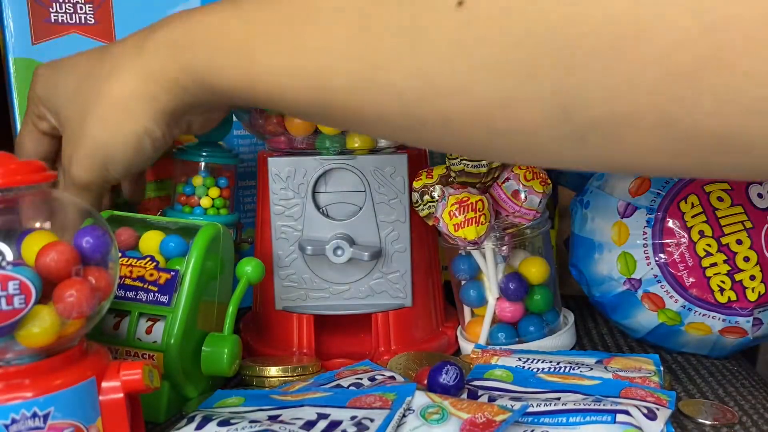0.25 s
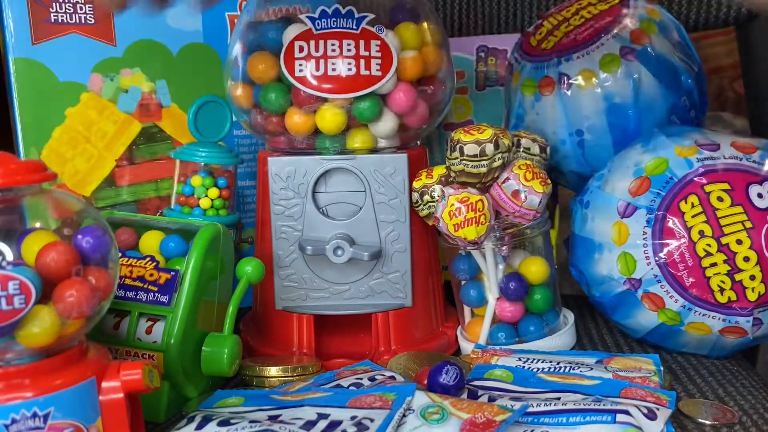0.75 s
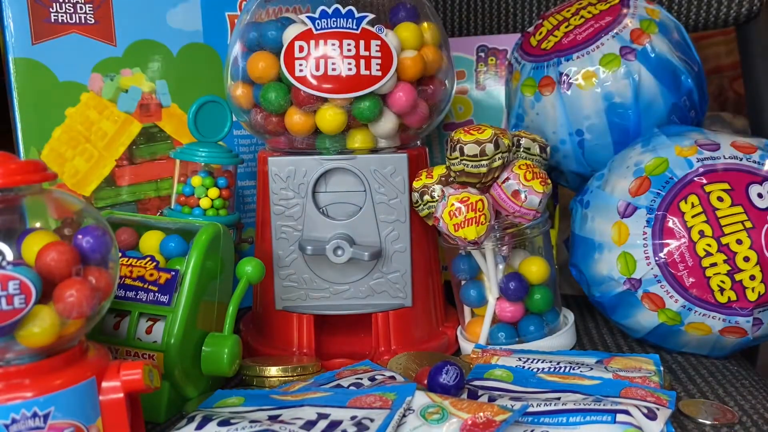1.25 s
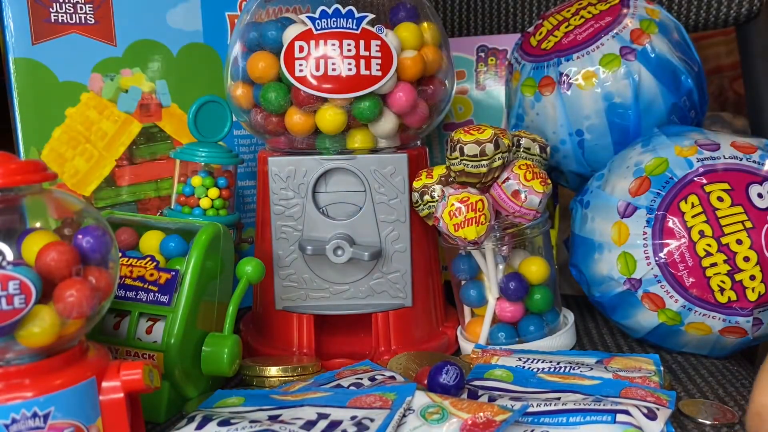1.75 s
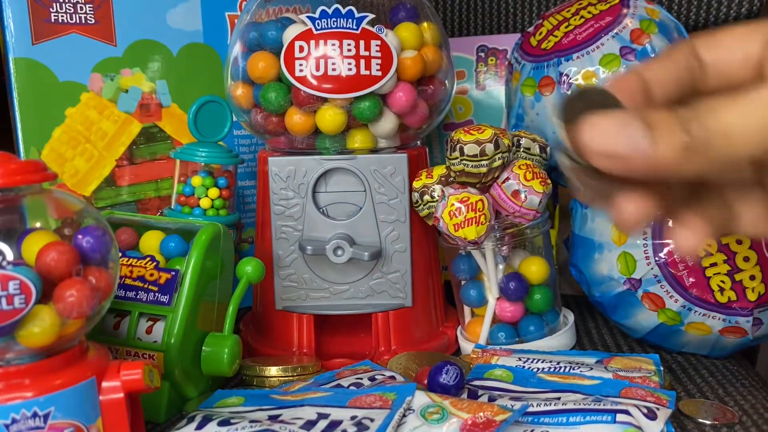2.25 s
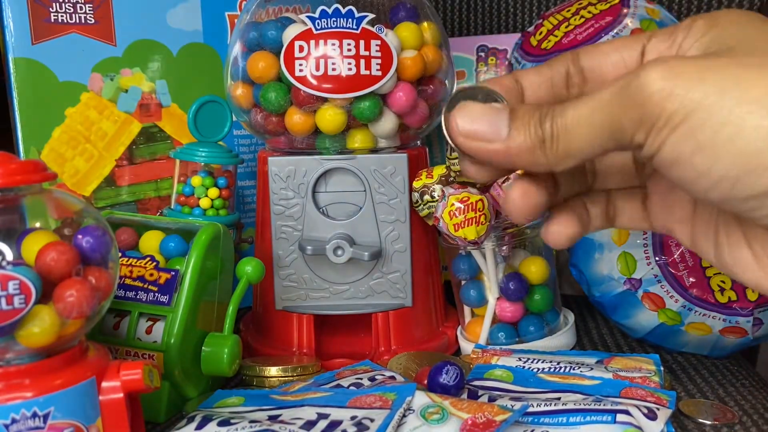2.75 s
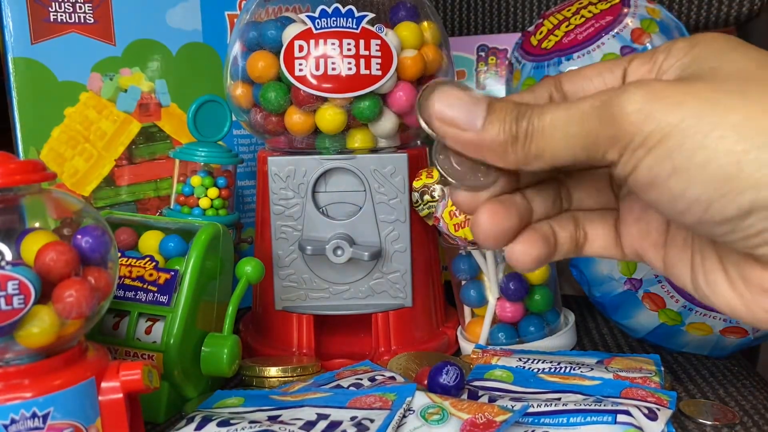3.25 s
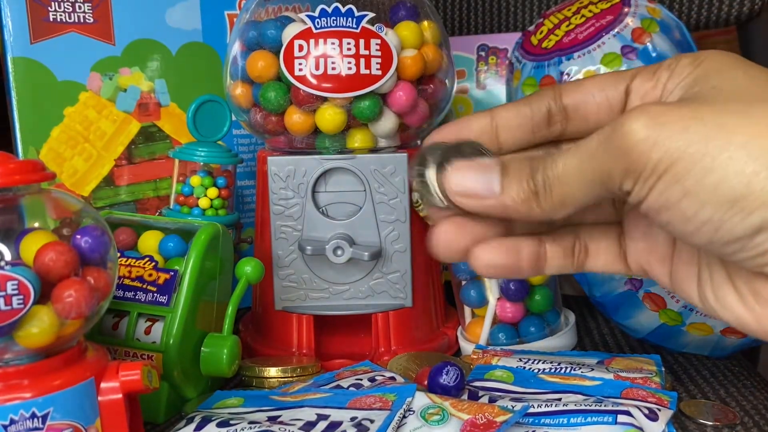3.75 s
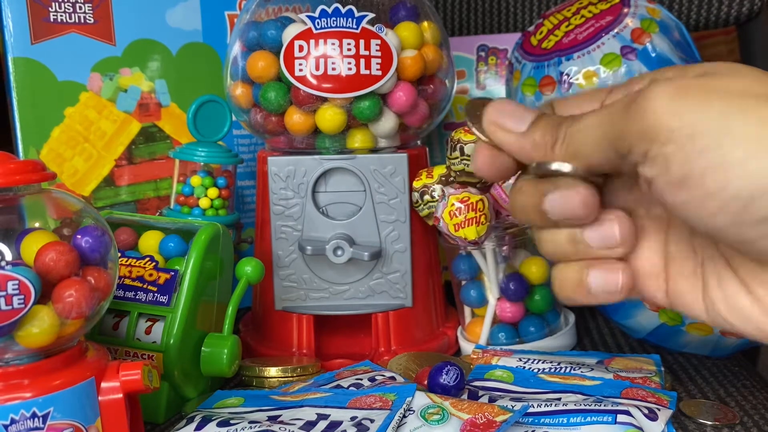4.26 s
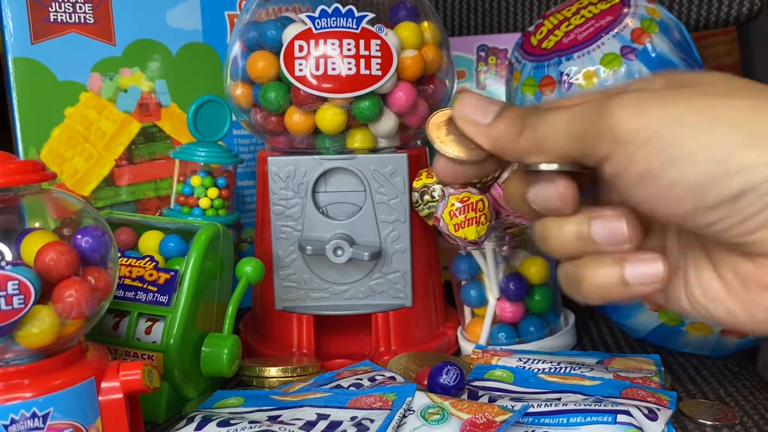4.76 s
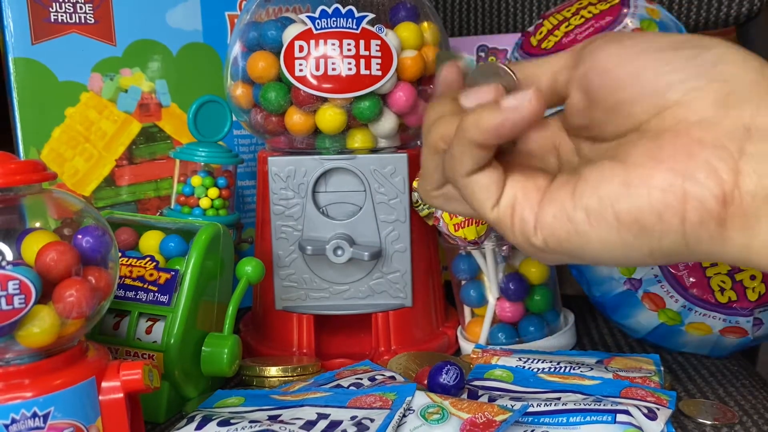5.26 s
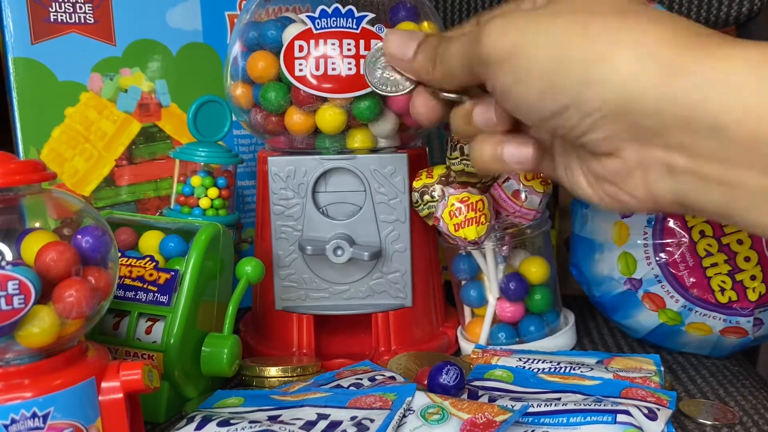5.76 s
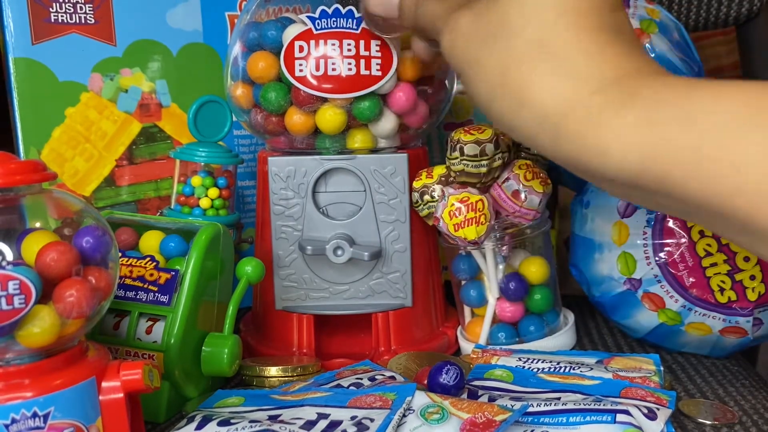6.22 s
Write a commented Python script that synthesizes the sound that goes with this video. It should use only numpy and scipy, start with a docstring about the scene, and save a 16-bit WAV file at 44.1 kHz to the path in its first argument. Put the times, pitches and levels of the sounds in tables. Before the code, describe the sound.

A small quiet room with a low hum. Fingers knock dully on hollow plastic toys slightly to the left while the table rumbles softly. After a pause, a few coins are fingered close to the stereo microphone: faint clinks at first, then bright, choked clinks and short metallic scrapes. A long near-silence follows, with a faint clink, and finally a coin taps a thin plastic lid on the right and bounces once.

```python
"""Over the low hum of a small, quiet room, a hand knocks on hollow plastic toys and the table rumbles.
Then a few coins are fingered close to the microphone: damped modes clink, dense runs of tiny blows slide.
Two coin grazes brush the lid of a toy gumball machine on the way; at last a full tap and its bounce ring it.
Knocks, coins and lid are banks of decaying modes with a noisy crack, sent to a short echo; the room is
filtered noise."""
import sys
import numpy as np
from scipy import signal
from scipy.fft import rfft, irfft, next_fast_len
from scipy.io import wavfile
from scipy.ndimage import uniform_filter1d

SR = 44100
rng = np.random.default_rng(int(sys.argv[2]) if len(sys.argv) > 2 else 0)


def log_audio(samples):
    """Write samples as a 16-bit WAV file to the path given in sys.argv[1]."""
    # one column per channel
    frames = np.atleast_2d(samples).T
    # limit to full scale, then quantise
    limited = np.clip(frames, -1, 1)
    pcm = np.round(limited * 32767).astype(np.int16)
    wavfile.write(sys.argv[1], SR, pcm)


N = 286209  # length of the scene [samples]
LEFT_RIGHT = np.array([[1], [-1]])  # opposite signs for the left and right channel


def undb(db):
    """Turn decibels into gain."""
    return 10 ** (np.asarray(db) / 20)


def unit(x):
    """Scale to an rms of one."""
    return x / np.sqrt(np.mean(x ** 2))


def contour(hz, points, column=1):
    """Read a table against frequency on a log axis."""
    rows = np.array(points)
    return np.interp(np.log(hz + 1), np.log(rows[:, 0]), rows[:, column])


def band(x, lo, hi, order=3):
    """Causal band-pass."""
    sos = signal.butter(order, [lo, min(hi, SR / 2 - 100)], "band", fs=SR, output="sos")
    return signal.sosfilt(sos, x)


def add(out, s, sound, pan_db):
    """Mix a sound in at time s; pan_db is left minus right."""
    i = int(s * SR)
    part = sound[:, :N - i]
    out[:, i:i + part.shape[1]] += part * undb(LEFT_RIGHT * pan_db / 2)


def ring(modes, damping, crack_db, crack_s, detune, vary_db, size, rise_s=.0003,
         port_phase=0.13, port_blur=0.27, chatter_db=5):
    """One blow: a chattering crack of contact over decaying modes, their pitch and weight varied per blow."""
    t = np.arange(size) / SR
    hz, db, t60 = np.array(modes).T[:, :, None]
    hz = hz * (1 + detune * rng.standard_normal(hz.shape))
    db = db + vary_db * rng.standard_normal(hz.shape)
    # each mode starts at a random phase, and the two ports part more at high pitch
    start_phase = 2 * np.pi * rng.random(len(modes))
    port_offset = port_phase * hz.T / 7000 * rng.standard_normal((2, len(modes)))
    phase = np.exp(1j * (start_phase + port_offset))
    decay = undb(db - 60 * damping * t / t60)
    tones = np.imag(phase @ (decay * np.exp(2j * np.pi * hz * t)))

    shared, apart, grain = rng.standard_normal((3, size))
    chatter = undb(chatter_db * unit(uniform_filter1d(grain, size=24)))
    # long waves reach both ports alike, short ones differ
    noise = shared + port_blur * LEFT_RIGHT * np.diff(apart, prepend=0)
    crack = noise * chatter * np.exp(-t / crack_s)
    return (unit(tones) + undb(crack_db) * unit(crack)) * (1 - np.exp(-t / rise_s))


def strike(events, blows, bands, pan_db, size):
    """Play a table of blows; brightness and weight shift the level of each register of the object."""
    rows, sounds, out = np.array(events), 0, np.zeros((2, N))
    for lo, hi, trim_db, *response in bands:
        db = rows[:, 1] + trim_db + rows[:, 2:] @ np.array(response)
        part = band(np.array(blows), lo, hi, order=4)
        # level each register by its loudest short-time rms
        peak = np.sqrt(uniform_filter1d(part ** 2, size, axis=2).max(axis=2, keepdims=True))
        sounds = sounds + undb(db)[:, None, None] * part / peak
    for s, sound in zip(rows[:, 0], sounds):
        add(out, s, sound, pan_db)
    return out


# tone of the still room: (frequency [Hz], relative density [dB per Hz])
ROOM_TONE = [(15, -38), (25, -26), (40, -11.5), (80, 1), (120, -6), (200, -13.5), (350, -16), (600, -22),
             (1000, -27), (2000, -33), (4000, -36.5), (7000, -38.5), (12500, -45), (15000, -48.5)]
# likeness of the room noise at the two ports: (frequency [Hz], correlation [-1 to 1])
PORT_LIKENESS = [(60, .7), (130, 0.54), (290, .46), (700, -0.46), (3000, 0.24), (6500, 0.025), (9000, 1),
                 (15000, .6)]


def air(noise_db=-70, hum_hz=58, hum_width_hz=5, hum_db=-69.0, whine_hz=1180, whine_db=-103, left_db=3.5):
    """Room rumble and faint hiss, with the wavering hum and thin whine of a distant appliance."""
    n = next_fast_len(N, True)
    hz = np.fft.rfftfreq(n, 1 / SR)
    mid, side, hum, whine = rfft(rng.standard_normal((4, n)))
    alike = np.clip(contour(hz, PORT_LIKENESS), -1, 1)
    ports = mid * np.sqrt(1 + alike) + LEFT_RIGHT * side * np.sqrt(1 - alike)
    lean = undb(LEFT_RIGHT * left_db / 2 / (1 + (hz / 130) ** 4))  # the bass is stronger on the left
    noise = unit(irfft(ports * lean * undb(contour(hz, ROOM_TONE))))
    # narrow bands of noise waver like unsteady tones
    hum = unit(irfft(hum * lean / (1 + ((hz - hum_hz) / hum_width_hz) ** 2)))
    whine = unit(irfft(whine / (1 + ((hz - whine_hz) / 10) ** 2)))
    return (undb(noise_db) * noise + undb(hum_db) * hum + undb(whine_db) * whine)[:, :N]


# rumble of the arm shifting on the table, before panning: (time [s], level [dB])
ARM_RUMBLE = [(0, -71), (.32, -62.5), (.55, -71.5), (1.3, -77.5), (2.1, -71), (2.5, -76), (3.2, -78.5),
              (4.3, -97.5)]


def table(start_s=0.097, hz=52, swell_s=0.032, db=-50, lo_hz=65, hi_hz=200):
    """The leaning hand sets the table rocking for a moment, and the moving arm rumbles on it."""
    clock = np.arange(N) / SR
    t = np.maximum(clock - start_s, 0)
    swell = t / swell_s * np.exp(1 - t / swell_s)
    sway = undb(db) * swell * np.sin(2 * np.pi * hz * t)
    rumble = unit(band(rng.standard_normal(N), lo_hz, hi_hz, order=2))
    rumble = rumble * undb(np.interp(clock, *np.transpose(ARM_RUMBLE)))
    return (sway + rumble) * undb(1.7 * LEFT_RIGHT)  # a little to the left


# fingers on the plastic toys; a nail is bright, a fingertip has weight:
# (time [s], strength [dB], brightness [dB], weight [dB])
TOY_KNOCKS = [(0.0956, -65.5, -40, 4), (0.2072, -49, -3, -18.5), (0.216, -66, 1.5, 1.5),
              (0.273, -61.5, -23, -12), (0.3024, -46.5, -11, -16), (0.3174, -54, -6.5, 4.5),
              (0.41, -60.5, -8, 0), (0.428, -73.5, -1, 13.5), (0.7039, -83.5, 21.5, -6)]
# modes of a hollow plastic toy: (frequency [Hz], level [dB], t60 before damping [s])
TOY_MODES = [(320, -14, 0.057), (601, -7, 0.05), (810, 0, 0.04), (897, 12, 0.029), (1135, 1, 0.079),
             (1210, -2.5, 0.064), (1470, -9, 0.024), (2030, 1, 0.031), (2740, -2, 0.027), (3510, 3, 0.016),
             (4730, -20, 0.026)]
# registers of the toy:
# (from [Hz], to [Hz], trim [dB], response to brightness [dB per dB], response to weight [dB per dB])
TOY_REGISTERS = [(690, 1480, 0, 0.07, 0.039), (4200, 15000, -1, 0.68, 0.11), (1450, 3990, 1.5, 1, 0.11),
                 (142, 640, 1.2, 0.083, 0.73)]


def toys():
    """Fingers excite the short, low modes of hollow plastic: dull knocks on the left."""
    blows = [ring(TOY_MODES, damping=1.7, crack_db=5.4, crack_s=0.011, detune=0.041, vary_db=1.5, size=2600)
             for _ in TOY_KNOCKS]
    return strike(TOY_KNOCKS, blows, TOY_REGISTERS, pan_db=3.5, size=176)


# echo of the room: (frequency [Hz], t60 [s], level [dB])
ROOM_ECHO = [(302, 0.13, -7.5), (987, 0.14, -6.5), (3060, 0.17, -8), (5112, 0.17, -9.5),
             (8300, 0.052, -10.5), (13700, 0.15, -16.5)]


def room(sent, build_s=0.0015, apart_hz=1200, treble_hz=6000, size=15000):
    """Boxes and walls close by scatter a short echo, each band of noise fading at its own pace."""
    t = np.arange(size) / SR
    edges = np.geomspace(150, 17000, 11)
    echo = 0
    for lo, hi in zip(edges, edges[1:]):
        centre = np.sqrt(lo * hi)
        fade = undb(-60 * t / contour(centre, ROOM_ECHO)) * (1 - np.exp(-t / build_s))
        fade *= undb(contour(centre, ROOM_ECHO, column=2)) / np.sqrt(np.sum(fade ** 2))
        mid, side = band(rng.standard_normal((2, size)), lo, hi)
        # the echo is widest in the middle register
        width = min(centre / apart_hz, 1) / (1 + (centre / treble_hz) ** 2)
        echo = echo + fade * (mid + width * side * LEFT_RIGHT) / np.sqrt(1 + width ** 2)
    return signal.oaconvolve(sent, echo, axes=1)[:, :N]


COIN_PAN_DB = 0.2  # left minus right
# coin against coin; a rim-on hit is bright, a coin pressed against something solid has weight:
# (time [s], strength [dB], brightness [dB], weight [dB])
COIN_CLINKS = [(1.4081, -68.5, 5, 16), (1.449, -62.5, 7.5, 18.5), (1.4963, -46, -1.5, 4.5),
               (1.7551, -48, 2, 13.5), (1.794, -56, 9, 16), (1.7979, -40.5, 9, 16), (1.8688, -55.5, 9, -7),
               (1.877, -51.5, 9, 8), (1.891, -59.5, 0, 21), (1.9044, -55, -10, 22), (1.9244, -50, 13.5, 14),
               (1.9592, -52.5, 7.5, 10.5), (2.1639, -62.5, 8, 8), (2.2422, -49, 3, 6),
               (2.2626, -39.5, -16, 4.5), (2.2877, -35, 10.5, 17), (2.3433, -44.5, 2, 2),
               (2.6388, -32.5, 4.5, 14), (2.893, -59.5, 6, 10), (2.9195, -25, 2, -5.5),
               (2.921, -22.5, 0.5, -8), (2.962, -37.5, 0.5, -5), (2.994, -44.5, 0, -6),
               (3.1189, -32.5, -6, -19), (3.1283, -32.5, 2.5, -33), (3.1543, -30.5, 4, 0.5),
               (3.2358, -41.5, 1.5, -13), (3.3313, -50.5, -7, 18), (3.3521, -30.5, 2.5, 1.5),
               (3.403, -34.5, -5, -5), (3.4768, -42.5, 3, -13), (3.4882, -35.5, -1.5, -7),
               (3.5941, -55, 1.5, -12.5), (3.782, -36, -3, 3), (3.833, -31, -12, -14),
               (4.0995, -43.5, -5, 12.5), (5.5089, -43, 13.5, 7)]
# modes of a few coins pinched between fingers, lying close together:
# (frequency [Hz], level [dB], t60 before damping [s])
COIN_MODES = [(2500, -11, 0.012), (3200, -10.5, 0.008), (4550, -8, 0.015), (4770, -11, 0.02),
              (5372, -9, 0.016), (5940, -14.5, .02), (6550, -5.5, 0.027), (6627, -8, .03),
              (6950, -5, 0.043), (7320, 0, .03), (7550, -2, .03), (7000, 1.5, 0.014), (7770, -2.5, 0.033),
              (7440, -2.5, 0.013), (7915, 1.5, 0.02), (8150, 1.5, .02), (9180, -4, 0.0083), (9870, -2, .02),
              (10630, -7, .025), (10710, -7, .015), (11210, -6.5, 0.012), (11350, -7.5, 0.022),
              (11570, -4, .02), (11880, -2.5, 0.018), (12600, -4, 0.024), (13220, -10, .02),
              (13850, -6.5, .022), (14670, -11, .02), (15400, -9, .02)]
# registers of the coins:
# (from [Hz], to [Hz], trim [dB], response to brightness [dB per dB], response to weight [dB per dB])
COIN_REGISTERS = [(6000, 9500, 1.5, 0, 0), (10230, 14800, -0.5, 1, 0), (2160, 7300, -11, 0, 0.6281),
                  (190, 1500, -41, 0.5, 1.3262)]


def clinks():
    """Rims meet; the fingers choke the ring within milliseconds."""
    blows = [ring(COIN_MODES, damping=1.8, crack_db=-0.5, crack_s=0.0023, detune=.0021, rise_s=.0005,
                  vary_db=6.0, size=1100) for _ in COIN_CLINKS]
    return strike(COIN_CLINKS, blows, COIN_REGISTERS, COIN_PAN_DB, size=88)


# coin sliding on coin, one push of the thumb each:
# (start [s], end [s], level [dB], brightness before the shared shimmer [dB])
COIN_SLIDES = [(1.434, 1.485, -61, -1), (1.885, 1.948, -57, -5), (2.244, 2.307, -43.5, 1),
               (2.368, 2.391, -46, 4), (2.594, 2.624, -55.5, 6.5), (2.631, 2.639, -35.5, -5),
               (2.912, 2.924, -27.5, -0.5), (2.937, 3.037, -54, 2), (3.102, 3.154, -32.5, 1),
               (3.221, 3.248, -52, 1.5), (3.287, 3.326, -44.5, 1), (3.349, 3.406, -48.5, -13),
               (3.426, 3.447, -42, -5), (3.454, 3.495, -48.5, -6), (3.56, 3.613, -61.5, 3.5),
               (3.713, 3.79, -36, 5), (3.818, 3.857, -41, 4.5), (3.852, 3.903, -56, -1),
               (3.992, 4.016, -63, -3.5), (4.083, 4.097, -54, -8), (4.17, 4.25, -79, 10),
               (5.46, 5.505, -75, 10)]


def push_shape(t, length, level_db, ease_s, build_share=.65, build_s=0.024, build_db=12, sag_db_per_s=20):
    """A push builds over a share of its length or a fixed time at most, under a steady sag, then stops."""
    build = build_db * np.minimum(t / min(build_share * length, build_s) - 1, 0)
    sag = sag_db_per_s * (t - length / 2)
    return undb(level_db + build - sag) * (t < length) * (1 - np.exp(-t / ease_s))


def slides(slip_hz=1100, scatter_db=4, catch_hz=75, catch_db=14, split_hz=9000, thin_hz=2350,
           shimmer_db=3, ease_s=.003):
    """Embossed faces catch and slip: dense uneven tiny blows ring the coins, with a clink where a rim catches."""
    out = np.zeros((2, N))
    hz = np.fft.rfftfreq(8192, 1 / SR)
    thin = (hz / thin_hz) ** 4 / (1 + (hz / thin_hz) ** 4)  # small discs radiate no bass
    above_split = 1 / (1 + np.exp((split_hz - hz) / 500))  # the treble that brightness acts on
    t = np.arange(2 * len(hz) - 2) / SR
    for start, end, level_db, bright_db in COIN_SLIDES:
        length = max(end - start, .002)
        push = push_shape(t, length, level_db, ease_s)
        rasp = 0
        # the point of contact travels, and the colour fades from one blow to another with it
        for share in (np.minimum(t / length, 1), np.maximum(1 - t / length, 0)):
            uneven = undb(scatter_db * np.minimum(rng.exponential(size=len(t)), 3))
            slips = (rng.random(len(t)) < slip_hz / SR) * uneven
            catches = (rng.random(len(t)) < catch_hz / SR) * undb(catch_db)
            blow = ring(COIN_MODES, damping=1.1, crack_db=-3.5, crack_s=0.0006, detune=0.0011,
                        vary_db=1.5, size=1100)
            # the tiny offset keeps a push without any slip from being all zeros
            rasp = rasp + rfft((slips + catches) * push * share + 1e-12) * rfft(blow, len(t))
        rasp = irfft(rasp * thin * undb((bright_db + shimmer_db) * above_split))
        rasp *= np.sqrt(np.sum(push ** 2) / np.sum(rasp ** 2, axis=1, keepdims=True))
        add(out, start, rasp, COIN_PAN_DB)
    return out


# a coin meets the gumball machine, two light grazes, then a full tap and its bounce:
# (time [s], strength [dB], weight [dB])
COIN_ON_LID = [(2.6388, -33, -20), (4.0998, -51, -9), (6.3265, -35.5, 1), (6.3345, -40.5, -0.5)]
# modes of the lid of the gumball machine: (frequency [Hz], level [dB], t60 before damping [s])
LID_MODES = [(740, -16.5, .09), (870, -10.5, 0.058), (1873, -2, 0.04), (2185, -11, 0.062),
             (3610, -10.5, 0.058), (4460, -14.5, 0.031), (4610, 0.5, 0.038), (4350, -1.5, 0.031),
             (5040, -8.5, 0.04), (5010, -5, .05), (4970, -0.5, 0.04), (5140, -1.5, 0.043),
             (5400, -13.5, 0.044), (7700, -9.5, 0.024), (7350, -10.5, 0.25), (11000, -6, 0.034),
             (12800, -13, .02)]
# registers of the lid: (from [Hz], to [Hz], trim [dB], response to weight [dB per dB])
LID_REGISTERS = [(4020, 5680, -1.5, 0.5), (5900, 13000, -6, 0.3), (1380, 3840, -8, 2.5),
                 (480, 1200, -20, 1)]


def lid():
    """A coin rings the machine's thin plastic on the right, its modes at the same pitch and balance each time."""
    blows = [ring(LID_MODES, damping=1.8, crack_db=4.0, crack_s=0.0035, detune=0, vary_db=0, size=3000)
             for _ in COIN_ON_LID]
    return strike(COIN_ON_LID, blows, LID_REGISTERS, pan_db=-4.5, size=176)


def scene(toys_wet_db=3, lid_wet_db=5):
    """The coins are close and dry; the toys and the lid stand further back, with more echo."""
    background = air() + table()
    knocks = toys()
    coins = clinks() + slides()
    taps = lid()
    echo = room(coins + undb(toys_wet_db) * knocks + undb(lid_wet_db) * taps)
    return background + knocks + coins + taps + echo


# the two microphone ports drift out of step through the treble: (frequency [Hz], lead of the left [radians])
PORT_LEAD = [(900, 0), (2100, 1.5), (3300, 1), (5200, -0.4), (6400, 1.1), (7100, 0.84), (8200, 3.5),
             (9000, 2.5), (10000, 4), (11000, 5.5), (12100, 4.5), (13000, 5), (13700, 8), (14400, 8),
             (15300, 10)]


def record(dry, top_hz=15800):
    """The two ports of the microphone differ in phase; the top is cut."""
    n = next_fast_len(N, True)
    hz = np.fft.rfftfreq(n, 1 / SR)
    ports = np.exp(1j * LEFT_RIGHT * contour(hz, PORT_LEAD) / 2)
    heard = irfft(rfft(dry, n) * ports)[:, :N]
    return signal.sosfilt(signal.ellip(8, .2, 70, top_hz, fs=SR, output="sos"), heard)


dry = scene()
out = record(dry)
log_audio(out)
```